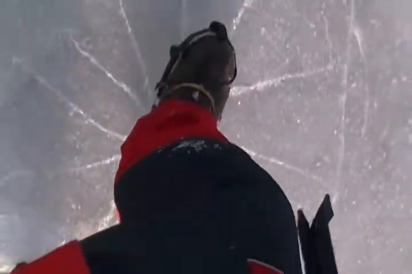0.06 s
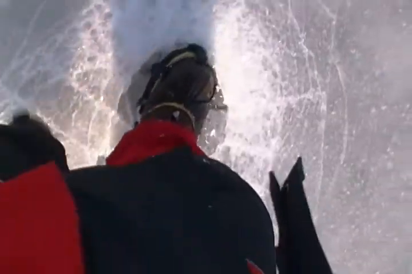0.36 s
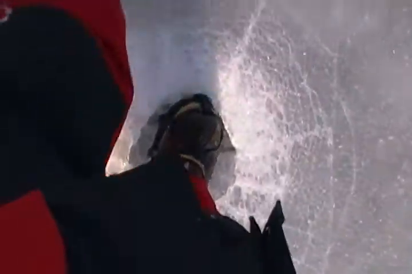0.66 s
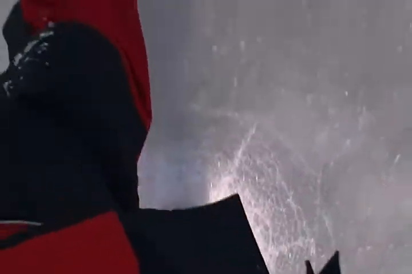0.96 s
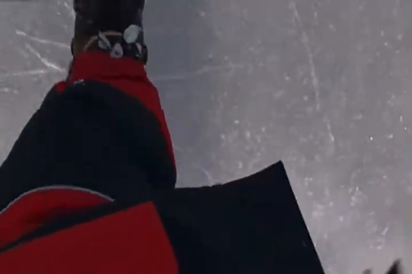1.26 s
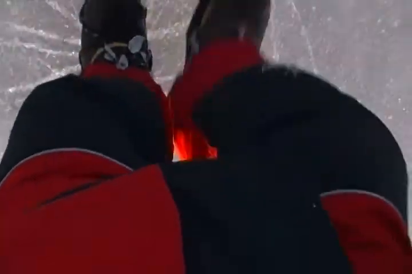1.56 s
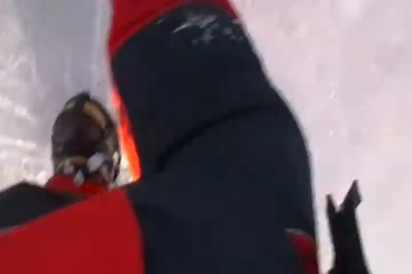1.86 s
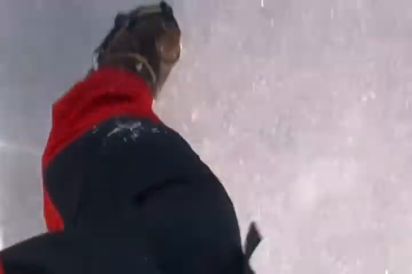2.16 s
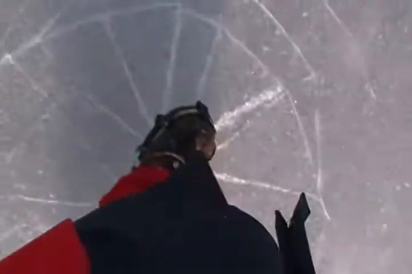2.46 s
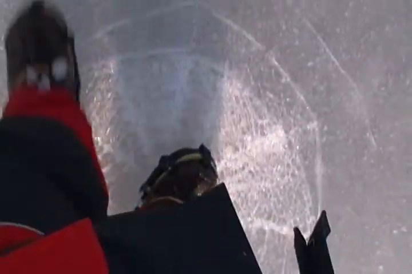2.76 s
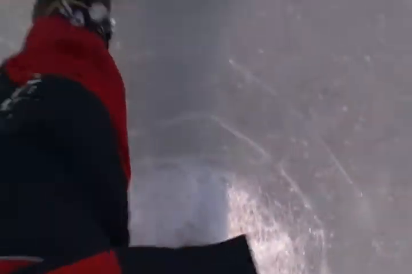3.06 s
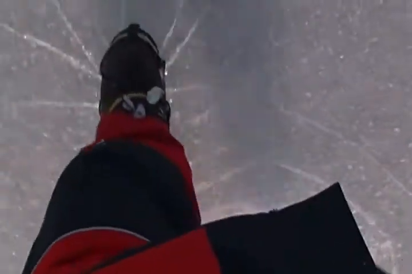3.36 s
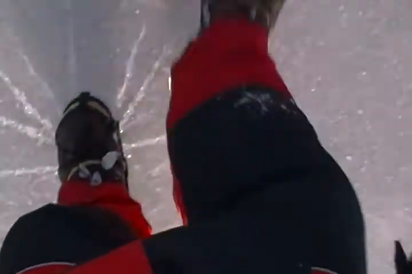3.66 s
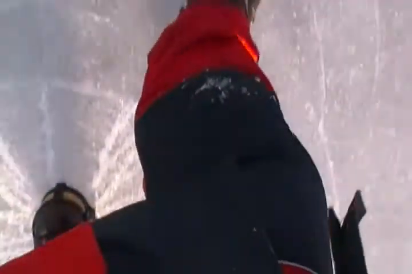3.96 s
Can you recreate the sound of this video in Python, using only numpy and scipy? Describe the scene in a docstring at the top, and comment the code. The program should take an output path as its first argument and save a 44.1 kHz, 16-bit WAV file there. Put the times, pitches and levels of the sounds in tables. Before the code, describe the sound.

Boots cracking and crunching through thin ice, with gusts of wind buffeting the microphone.

```python
"""Boots on thin layered ice, heard close from the two microphone ports of a camera worn on the body.
The first step snaps the top sheet; splinters crunch, plates knock and grind as the boot sinks, and water
blips below. Before the one-second mark a gust buffets the ports with a faint whistle. More steps break
through, and the wind eases after two seconds. Clothing rustles throughout; a limiter flattens the peaks."""
import sys
import numpy as np
from scipy import signal
from scipy.fft import rfft, irfft
from scipy.io import wavfile
from scipy.ndimage import uniform_filter1d, minimum_filter1d

SR = 44100
rng = np.random.default_rng(int(sys.argv[2]) if len(sys.argv) > 2 else 0)


def output_pcm(signal):
    """Save a mono or channel-first signal as 16-bit PCM at the path in sys.argv[1].

    Samples are clipped to [-1, 1] before scaling.
    """
    pcm = np.clip(np.atleast_2d(signal).T, -1, 1) * 32767
    wavfile.write(sys.argv[1], SR, np.round(pcm).astype(np.int16))


N = 176400
TOP_HZ = 13100  # highest ringing pitch, and the final treble cut

# Tone of a ringing ice plate. Each row: frequency in Hz, gain in dB.
RING_SPECTRUM = [(150, -12.5), (450, 3.5), (1000, -2), (2300, -3), (3500, -11), (10000, -36)]


def cracks(size=2048, count=4):
    """Each fracture runs in sharp bursts, the first the strongest; a shard rings and the sheet thuds."""
    # Cracks through the top sheet. Each row: start in seconds, snap level in dB, thud level in dB.
    fractures = [(0.05, -15.5, -28), (0.069, -8.5, -13), (0.0898, -6, -29), (0.1139, -15, -28),
                 (0.1198, -6, -13), (0.1345, -8.0, -4), (0.1505, 2.5, -2), (0.1653, -14.5, -26),
                 (0.2186, -1, -5), (0.2266, 0.5, -19.0), (0.233, -7.0, -22), (0.248, 2.5, -13),
                 (0.3074, -3, -10), (0.3587, -7, -3.5), (0.395, -2, -13), (1.0723, -12, -9),
                 (1.083, -10, -15), (1.1144, -24.5, -27), (1.1474, -21.5, -17), (1.2414, -17, -19),
                 (1.2598, -5.5, -23), (1.2761, -10, -24), (1.301, -1, -8), (1.3277, -14, -9),
                 (1.38, -5.5, -8.5), (1.4494, -7.5, -9), (1.5594, -4, -20.0), (1.6146, -17, -29),
                 (1.628, -5, -8), (1.651, -10, -9), (1.6843, -4, -11), (1.7159, -15, -6),
                 (1.732, -13.5, -6.5), (1.7689, -12.5, -19), (2.185, -15, -25), (2.208, -7, -17),
                 (2.3592, -6, -3), (2.4356, -5, 0), (2.441, 2, -21), (2.5736, -2.5, -8.5),
                 (2.6134, -9.5, -8), (2.6388, -3, -9.5), (2.6532, 0, -17), (2.6881, -2.5, -8),
                 (2.6976, 4.5, -9), (2.7791, -8.5, -8), (2.8368, -11, -6), (2.9013, -1.5, 3),
                 (3.1961, -9, -6.5), (3.3004, -24, -10), (3.3168, -2.5, -15), (3.4237, -6.0, -7.5),
                 (3.4648, -7, -10), (3.4813, 3, -3), (3.5144, -16.5, -11.5), (3.5853, -19, -31),
                 (3.6698, -1, -15), (3.679, -3, -21), (3.7176, -6, -21), (3.7888, -2.5, -16.5),
                 (3.8826, -21, -16)]
    # Tone of the bright snap. Each row: frequency in Hz, gain in dB.
    snap_spectrum = [(300, -42), (1200, -16), (2500, 0), (4500, 4.5), (7500, 3), (9000, -3.5), (11500, -9),
                     (13500, -29.5)]
    burst_decay_s, burst_gap_s, burst_step_db = 0.00069, 0.0022, -7
    shard_centre_hz, shard_decay_s, shard_db = 3454, 0.0011, -5.5
    thud_centre_hz = 1836
    out, t = np.zeros((2, N)), np.arange(size) / SR
    for start, snap_db, thud_db in fractures:
        gaps = burst_gap_s * (.5 + rng.random(count))
        bursts = np.zeros(size)
        for k in range(count):
            add(bursts, gaps[:k].sum(), undb(k * burst_step_db) * np.exp(-t / burst_decay_s))
        shard_hz = min(shard_centre_hz * np.exp(0.365 * rng.standard_normal()), TOP_HZ)
        shard = undb(shard_db) * np.sin(2 * np.pi * shard_hz * t) * np.exp(-t / shard_decay_s)
        snap = bursts * rng.standard_normal((2, size))  # mid and side
        add(snap[0], 0, shard)
        add(out, start, blow(colour(snap, snap_spectrum), snap_db))
        thud_hz = thud_centre_hz * np.exp(0.14 * rng.standard_normal())
        add(out[0], start, blow(flex(thud_hz), thud_db))
    return out


def flex(hz, size=2048, rise_cycles=0.55, ring_decay_s=0.0022, ring_db=-6):
    """The sheet swings once or twice, high waves arriving first, then rings briefly."""
    t = np.arange(size) / SR
    cycles = t * hz
    age = cycles / rise_cycles
    phase = 0.88 * cycles + 0.18 * (1 - np.exp(-cycles))  # pitch falls from 1.06 to 0.88 times hz
    swing = -np.sin(2 * np.pi * phase) * age * np.exp(1 - age)
    ring = unit(colour(rng.standard_normal(size), RING_SPECTRUM)) * np.exp(-t / ring_decay_s)
    return swing + undb(ring_db) * ring


def knocks():
    """Whole plates give way with a dull knock or a low thump."""
    # Breaking plates. Each row: start in seconds, level in dB, pitch in Hz.
    breaks = [(0.0294, 6, 1380), (0.4016, 0, 990), (1.0194, -9.5, 583), (1.0858, 5, 910), (1.135, 0, 1330),
              (1.1696, 4, 1180), (1.1935, -17, 1170), (1.2059, -10, 1150), (1.258, -7, 220),
              (1.335, -9.5, 1630), (1.838, -3.5, 1300), (1.9064, -8, 1160), (2.162, 1.5, 1130),
              (2.211, -2.5, 397), (2.2876, 11, 1270), (2.399, 7, 1590), (2.4721, 3, 1380),
              (2.523, -14.5, 880), (2.9858, 6, 800), (3.189, -5, 1170), (3.207, 4.5, 1120),
              (3.38, -8, 1300), (3.4652, 4.5, 2670), (3.899, 9.5, 1560)]
    out = np.zeros((2, N))
    for start, db, hz in breaks:
        add(out[0], start, blow(flex(hz), db))
    return out


def crunch(flurry_db=2.7, fizz_db=-9, tap_db=-12):
    """Flurries of splinters, a fizz of ice dust and taps of tipping plates follow the load on the boot."""
    # Splintering under the sole. Each row: time in seconds, level in dB.
    load = [(0, -22.5), (.2, -26.5), (.23, -17.5), (.28, -22), (.43, -16.5), (.47, -33.5), (.53, -26),
            (.76, -38.5), (1.02, -47), (1.07, -24), (1.19, -34.5), (1.27, -26.5), (1.36, -23), (1.5, -35),
            (1.6, -41), (1.69, -19.5), (1.78, -17), (1.85, -31), (2.06, -35), (2.17, -46), (2.21, -13),
            (2.24, -38), (2.33, -31.5), (2.44, -17), (2.5, -35), (2.58, -23), (2.71, -24), (2.8, -24),
            (3.05, -22.5), (3.12, -39.5), (3.2, -28.5), (3.36, -20), (3.62, -31.5), (3.72, -29.5),
            (3.85, -29.5), (3.93, -21), (4, -25.5)]
    # Tone of the splinters and dust. Each row: frequency in Hz, gain in dB.
    splinter_spectrum = [(100, -26), (350, -1), (700, -8.5), (1500, -3), (2800, -2), (7200, -3.5),
                         (9000, -9.5), (11200, -12), (13300, -41)]
    splinters = unit(grains(per_s=2600, spread_db=2.6) * undb(flurry_db * walk(110)))
    fizz = undb(fizz_db) * rng.standard_normal((2, N))
    taps = unit(colour(grains(per_s=83, spread_db=2), RING_SPECTRUM))
    crushed = unit(colour(splinters + fizz, splinter_spectrum))
    return curve(load) * (crushed + undb(tap_db) * taps)


def grinding(count=200, size=768):
    """Broken plates slip over each other in short spells; every slip rings one plate for a few cycles."""
    # The boot sinks or pulls free.
    # Each row: start in seconds, length in seconds, level in dB, centre pitch in Hz.
    spells = [(0.385, 0.1, -17.5, 1070), (0.433, 0.016, -9, 1230), (0.452, 0.045, -22, 990),
              (0.503, 0.019, -22.5, 1120), (0.525, 0.11, -25.5, 685), (0.615, 0.05, -18, 810),
              (1.045, 0.043, -17.5, 880), (1.11, 0.052, -25, 1490), (1.748, 0.096, -15.5, 1255),
              (1.84, 0.029, -12.5, 1076), (1.873, 0.099, -21, 1180), (2.156, 0.028, -20, 1300),
              (2.202, 0.038, -12, 890), (2.276, 0.012, -20.5, 1200), (2.379, 0.11, -22.5, 1300),
              (2.772, 0.26, -28, 2280), (2.975, 0.15, -18, 934), (3.023, 0.16, -15.5, 786),
              (3.177, 0.058, -23, 1270), (3.504, 0.044, -27, 2150), (3.892, 0.11, -14, 1130)]
    slips_per_s, force_spread_db, log_pitch_spread, decay_cycles = 900, 4, 0.553, 2.6
    rise_share, fall_share = 0.053, 0.38
    out, t = np.zeros(N), np.arange(size) / SR
    for start, length, db, centre_hz in spells:
        jitter = rng.random(count)
        pitch, force = rng.standard_normal((2, count))
        spell = np.zeros(int(length * SR))
        for k in range(min(int(length * slips_per_s), count)):
            hz = min(centre_hz * np.exp(log_pitch_spread * pitch[k]), TOP_HZ)
            ring = np.sin(2 * np.pi * hz * t) * np.exp(-t * hz / decay_cycles) * np.sqrt(hz / centre_hz)
            push = (-1) ** k * undb(force_spread_db * force[k])
            add(spell, (k + jitter[k]) / slips_per_s, push * ring)
        progress = np.linspace(0, 1, len(spell))
        fade = np.clip(np.minimum(progress / rise_share, (1 - progress) / fall_share), 0, 1)
        add(out, start, undb(db) * unit(spell) * fade)
    return out


def blips():
    """Air pockets in the water under the ice ring with a rising pitch."""
    # Each row: start in seconds, level in dB, first and last pitch in Hz, length in seconds.
    air_pockets = [(0.192, -22, 487, 510, 0.028), (0.303, -14.5, 296, 545, 0.03),
                   (0.525, -14.5, 760, 840, 0.019)]
    out = np.zeros(N)
    for start, db, first_hz, last_hz, length in air_pockets:
        hz = np.geomspace(first_hz, last_hz, int(length * SR))
        tone = np.sin(2 * np.pi * np.cumsum(hz) / SR)
        add(out, start, undb(db) * np.sqrt(np.hanning(len(hz))) * tone)
    return out


def wind(flutter_db=5, rumble_db=-37.5):
    """Separate eddies buffet each port, mostly harder on the left, over the rumble of steady airflow."""
    # Gusts on the ports. Each row: time in seconds, left level in dB, right level in dB.
    gust_levels = [(0, -25, -29), (.12, -33, -48), (.42, -40.5, -37), (.52, -26.5, -41), (.74, -31, -41),
                   (.79, -15, -29), (.91, -9, -20), (1.07, -10, -23), (1.17, -27, -37), (1.26, -14.5, -23),
                   (1.34, -24, -28), (1.44, -9.5, -25), (1.55, -5.5, -12.5), (1.7, -18.5, -29),
                   (1.85, -24.5, -38), (1.98, -16.5, -23), (2.38, -21, -38), (2.51, -36, -56),
                   (2.6, -31.5, -31.5), (2.95, -27.5, -36), (3.2, -39, -46), (3.33, -18, -22.5),
                   (3.55, -46, -40), (4, -40, -47)]
    # Tone of the gusts and of the rumble. Each row: frequency in Hz, gain in dB.
    gust_spectrum = [(15, -23), (30, -6), (75, -2), (190, -2), (350, -14.5), (600, -36), (1300, -65),
                     (4000, -64)]
    rumble_spectrum = [(15, -8), (35, 3.5), (160, -11), (600, -59)]
    gusts = []
    for port in (1, 2):
        eddies = colour(rng.standard_normal(N), gust_spectrum) * undb(flutter_db * walk(45))
        gusts.append(curve(gust_levels, column=port) * unit(eddies))
    rumble = unit(colour(rng.standard_normal((2, N)), rumble_spectrum))
    return np.array(gusts) + undb(rumble_db) * rumble


def clothing(level_db=-34.5, flutter_db=4.5):
    """Fabric close to the microphone gives a soft, fluttering rustle."""
    # Tone of the fabric. Each row: frequency in Hz, gain in dB.
    cloth_spectrum = [(100, -2), (450, -1.5), (1500, -6.5), (6800, -23), (11500, -70), (13500, -33)]
    level = undb(level_db + flutter_db * walk(18))
    return level * unit(colour(rng.standard_normal((2, N)), cloth_spectrum))


def whistle(start_s=0.74, length_s=0.61, hz=1710, width_hz=110, level_db=-36.5):
    """A faint, airy whistle swells and fades in the first gust."""
    progress = np.clip((np.arange(N) / SR - start_s) / length_s, 0, 1)
    tone = signal.lfilter(*signal.iirpeak(hz, hz / width_hz, fs=SR), rng.standard_normal(N))
    return undb(level_db) * np.sin(np.pi * progress) * unit(tone)


def ports(mid_side):
    """Mid and side to left and right; the two ports differ mostly in the treble."""
    # Stereo width at the ports. Each row: frequency in Hz, gain of the side signal in dB.
    width = [(200, -25), (700, -9.5), (2000, -12.5), (4000, -11.5), (8000, -7), (12000, -0.5)]
    mid, side = mid_side[0], colour(mid_side[1], width)
    return np.array([mid + side, mid - side])


def undb(db):
    """Decibels to gain."""
    return 10 ** (np.asarray(db) / 20)


def unit(x):
    """Scale to rms 1."""
    return x / np.sqrt(np.mean(x ** 2) + 1e-18)


def curve(table, column=1):
    """Gain over time from one dB column of a table."""
    rows = np.array(table)
    return undb(np.interp(np.arange(N) / SR, rows[:, 0], rows[:, column]))


def colour(x, points):
    """Minimum-phase filter with the given (Hz, dB) response."""
    n, rows = x.shape[-1], np.array(points)
    hz = np.maximum(np.fft.rfftfreq(n, 1 / SR), 1)
    gain = undb(np.interp(np.log(hz), np.log(rows[:, 0]), rows[:, 1]))
    cepstrum = irfft(np.log(gain), n)
    cepstrum[1:n // 2] *= 2
    cepstrum[n // 2 + 1:] = 0
    return irfft(rfft(x) * np.exp(rfft(cepstrum)), n)


def walk(per_s):
    """Slow random wander with rms 1."""
    hold = int(SR / per_s)
    steps = np.repeat(rng.standard_normal(N // hold + 1), hold)
    return unit(uniform_filter1d(steps, hold)[:N])


def grains(per_s, spread_db):
    """Random clicks of very unequal size, as mid and side."""
    hit = rng.random(N) < per_s / SR
    size = hit * undb(spread_db * np.minimum(rng.exponential(size=N), 4.5))
    return size * np.array([rng.choice([-1, 1], N), rng.standard_normal(N)])


def add(out, start, sound):
    """Mix a sound in at a start time in seconds."""
    i = max(int(start * SR), 0)
    part = sound[..., :max(out.shape[-1] - i, 0)]
    out[..., i:i + part.shape[-1]] += part


def blow(x, db, length_s=0.0028):
    """Give a short sound the energy of a steady one of this level and length."""
    return x * undb(db) * np.sqrt(length_s * SR / np.sum(x ** 2, axis=-1, keepdims=True))


def scene():
    """Ice underfoot and clothing at the two ports, with water and wind."""
    return ports(cracks() + knocks() + crunch() + clothing()) + grinding() + blips() + wind() + whistle()


def record(dry, ceiling=1.126, release_s=0.012, window=24):
    """A fast look-ahead limiter holds peaks near full scale; what is left clips, and the top is cut."""
    fall = np.arange(N) / SR / release_s
    overshoot = np.log(np.maximum(np.abs(dry).max(axis=0) / ceiling, 1))
    reduction = np.maximum.accumulate(overshoot + fall) - fall
    gain = np.exp(uniform_filter1d(minimum_filter1d(-reduction, window), window))
    treble_cut = signal.ellip(8, .1, 50, TOP_HZ, fs=SR, output="sos")
    return signal.sosfilt(treble_cut, np.clip(dry * gain, -1, 1))


dry = scene()
out = record(dry)
output_pcm(out)
```